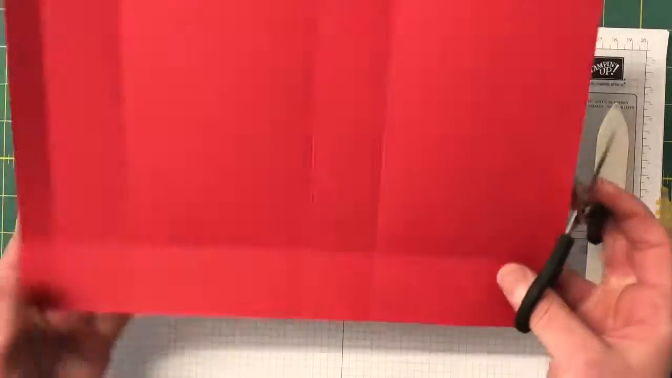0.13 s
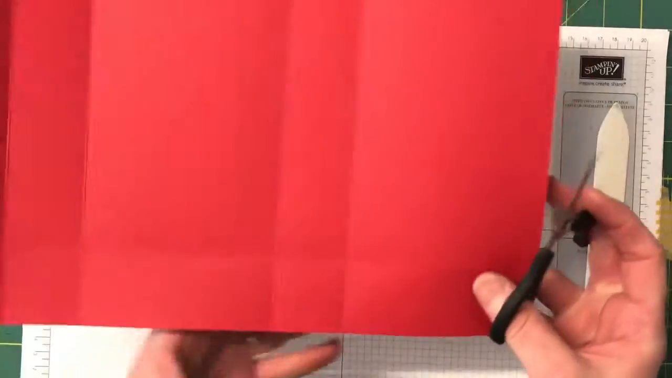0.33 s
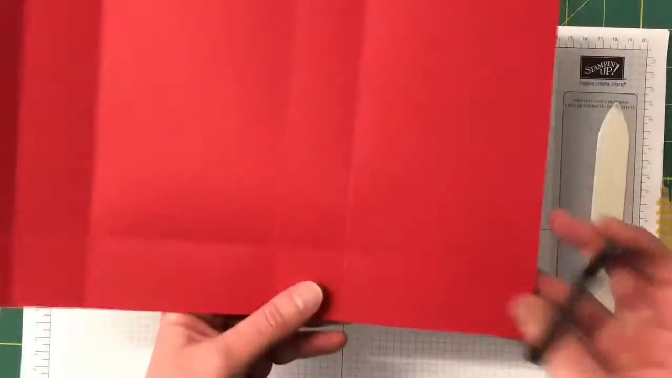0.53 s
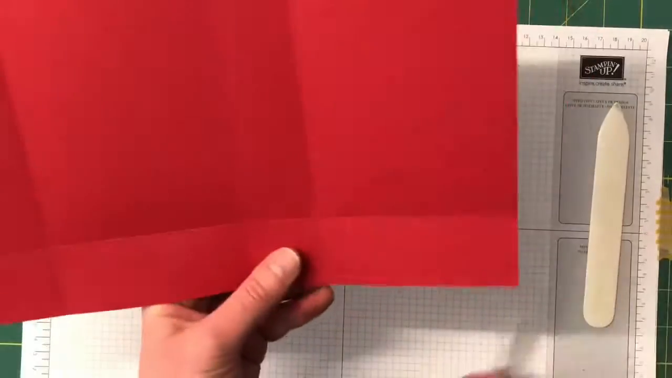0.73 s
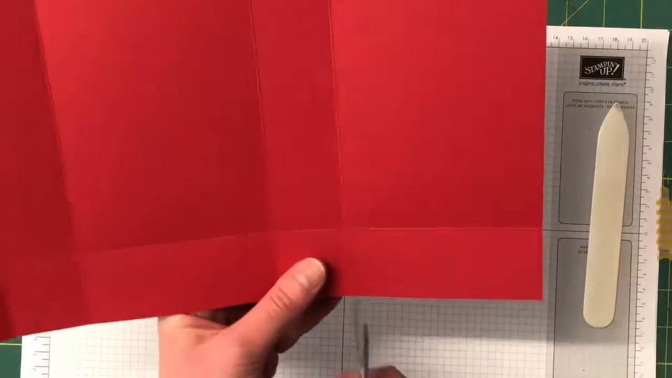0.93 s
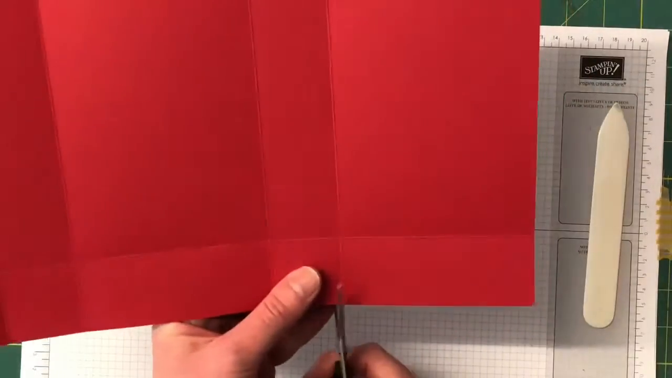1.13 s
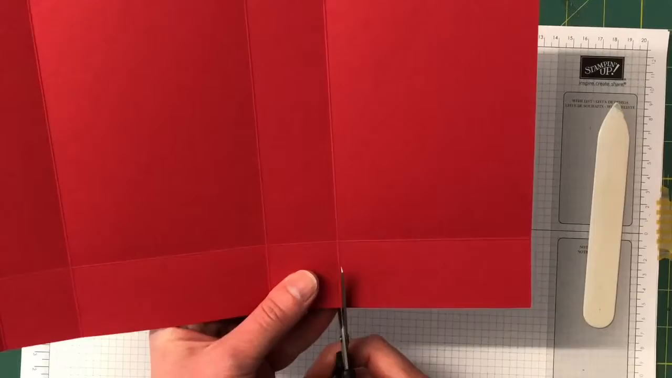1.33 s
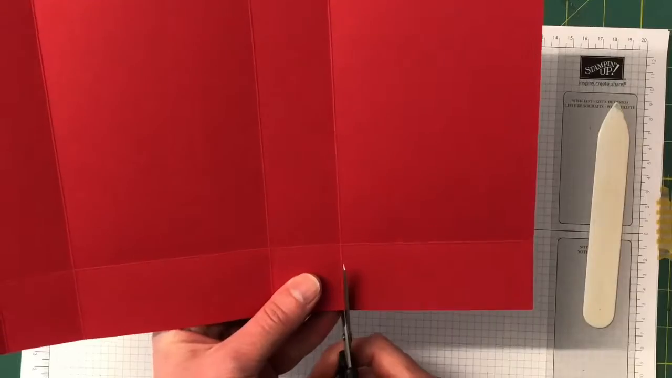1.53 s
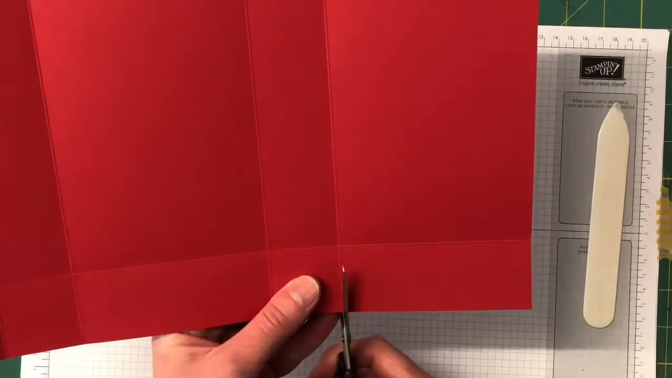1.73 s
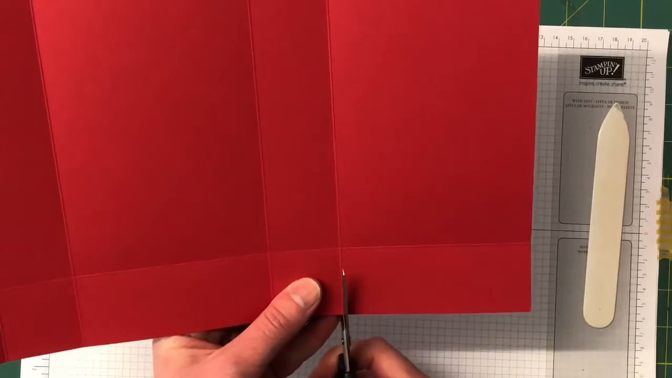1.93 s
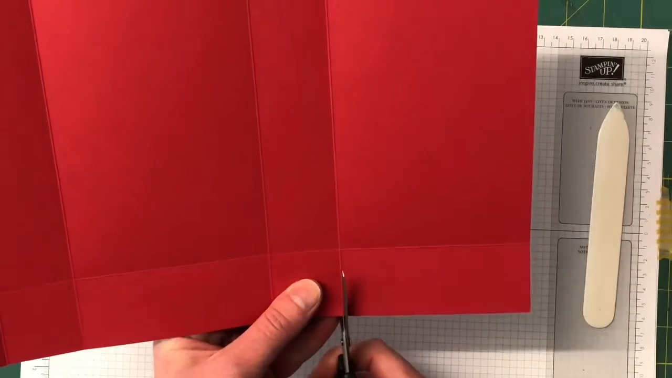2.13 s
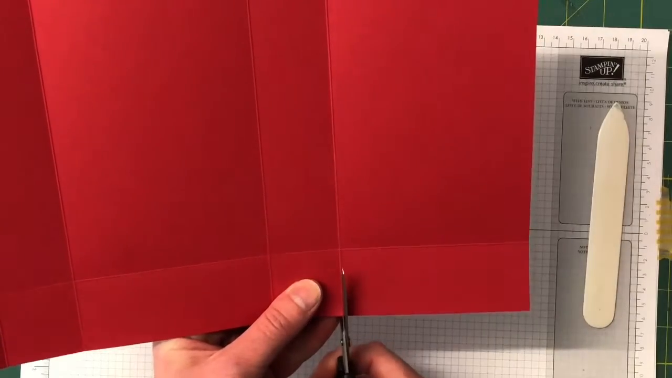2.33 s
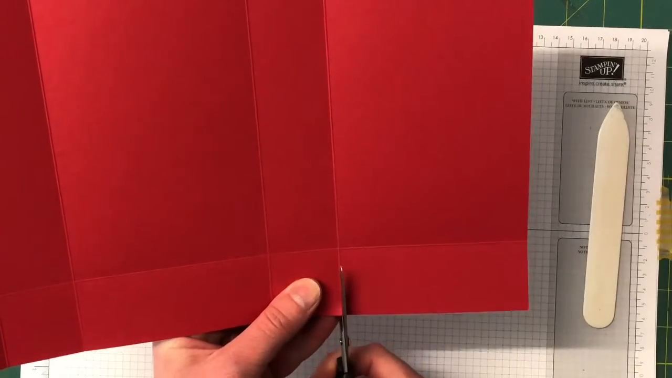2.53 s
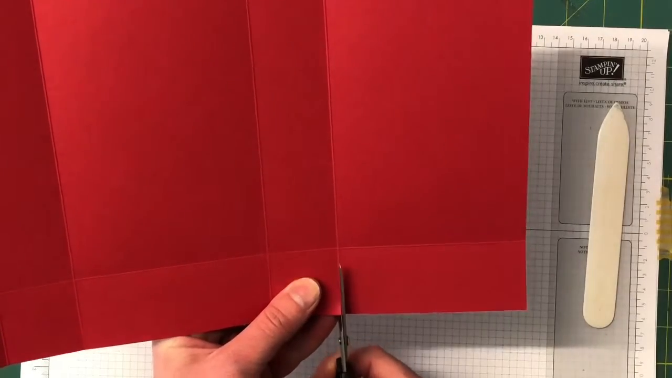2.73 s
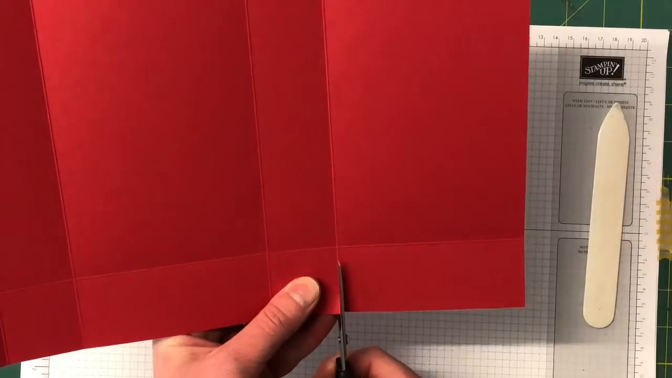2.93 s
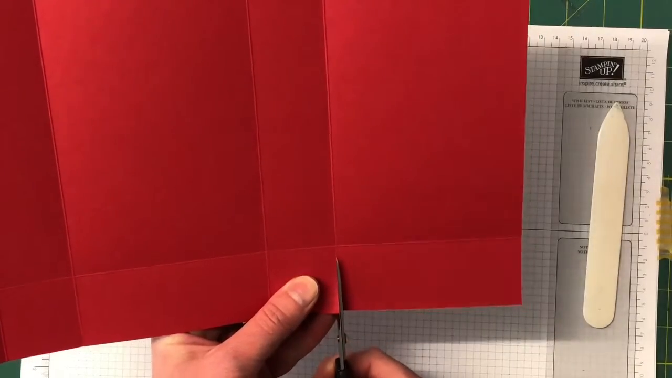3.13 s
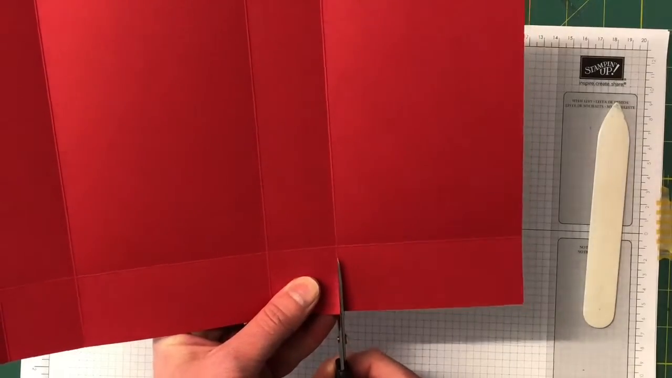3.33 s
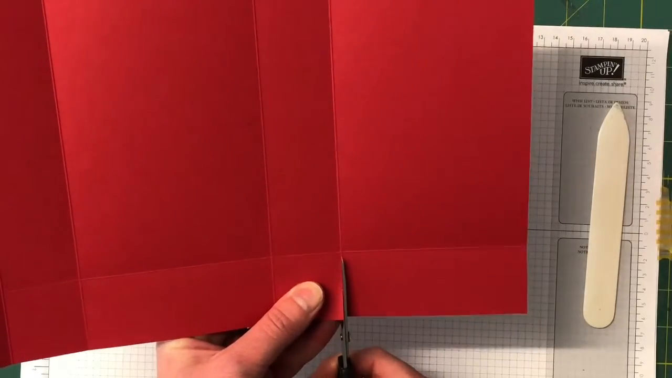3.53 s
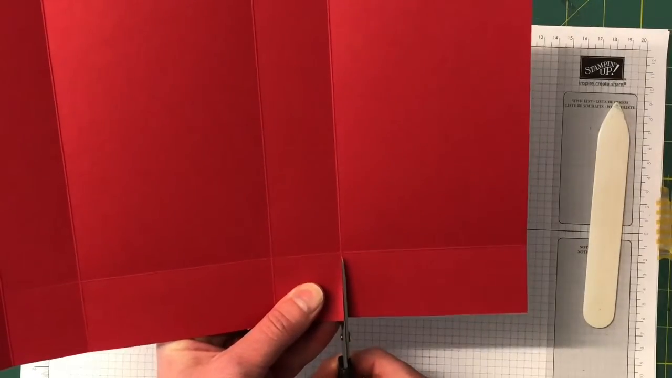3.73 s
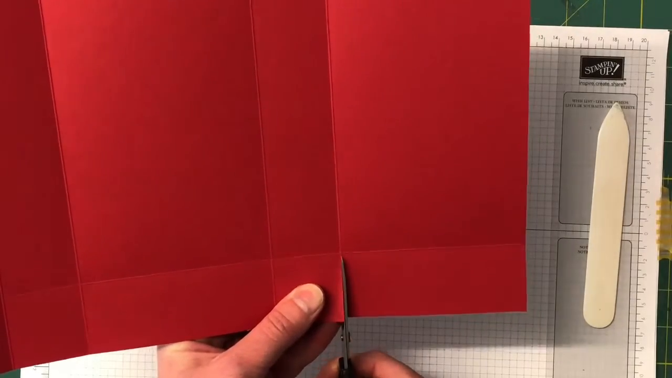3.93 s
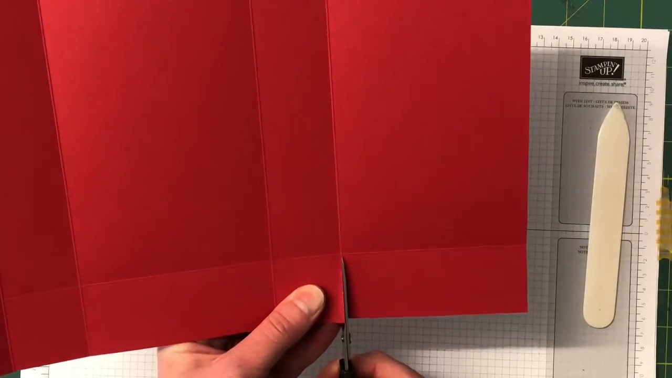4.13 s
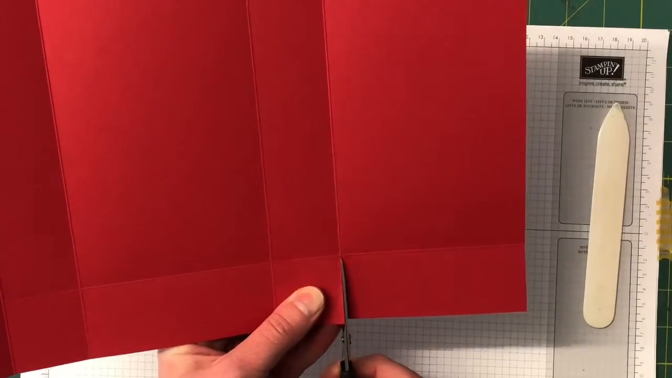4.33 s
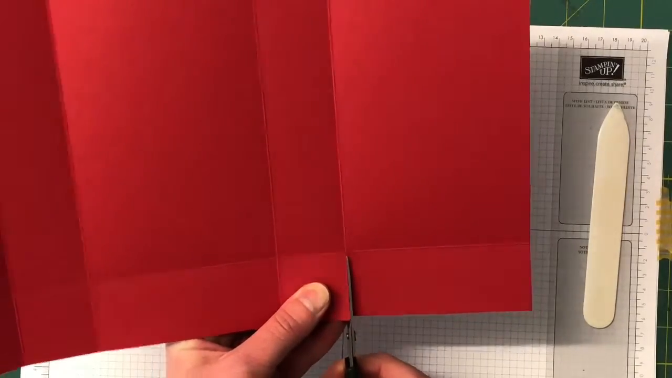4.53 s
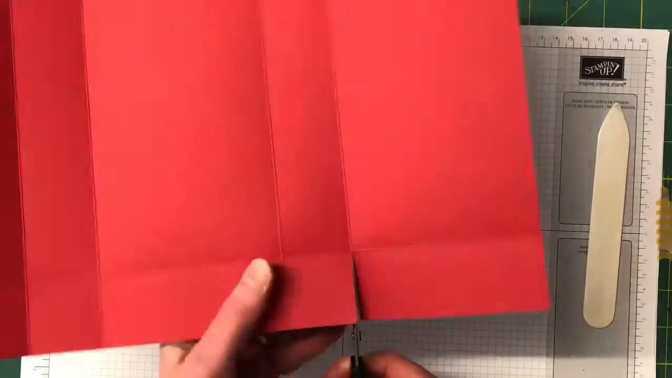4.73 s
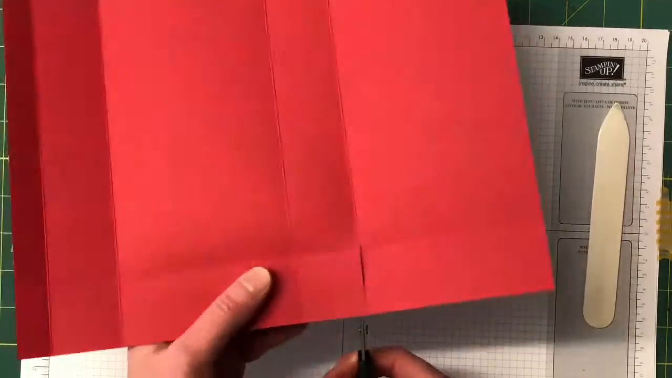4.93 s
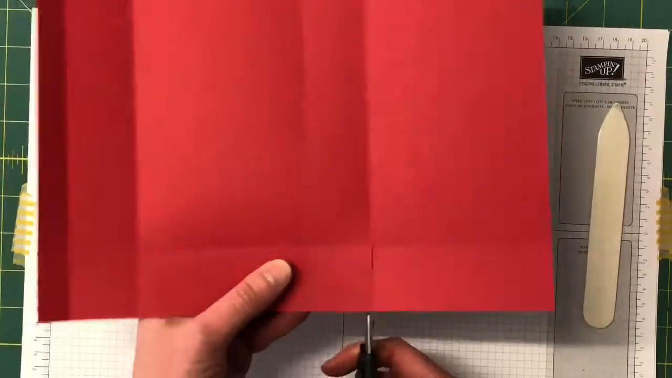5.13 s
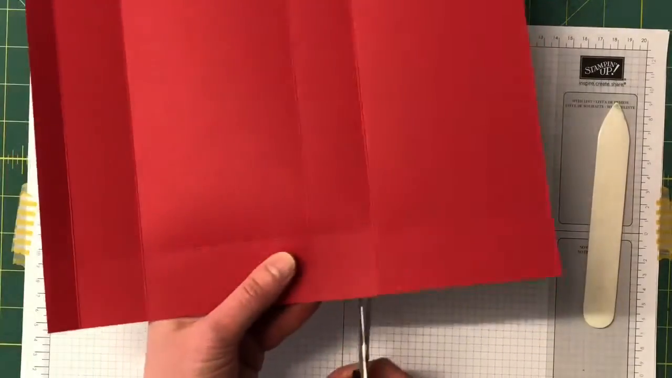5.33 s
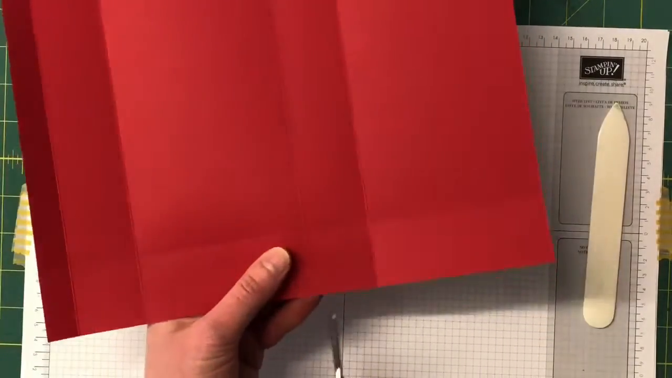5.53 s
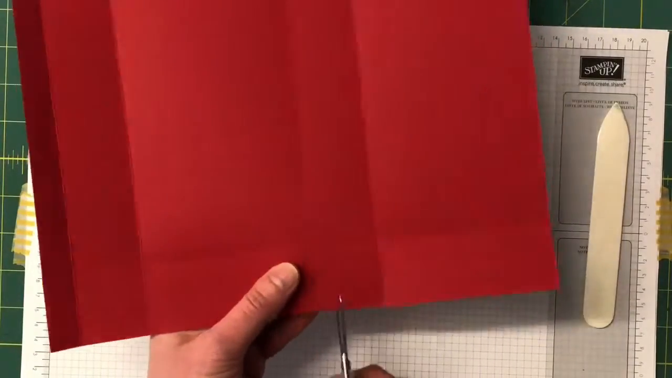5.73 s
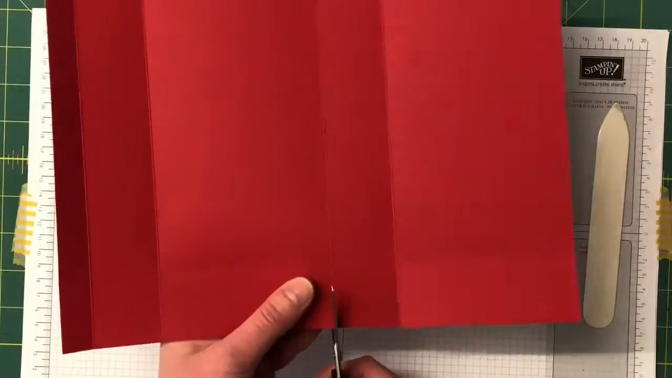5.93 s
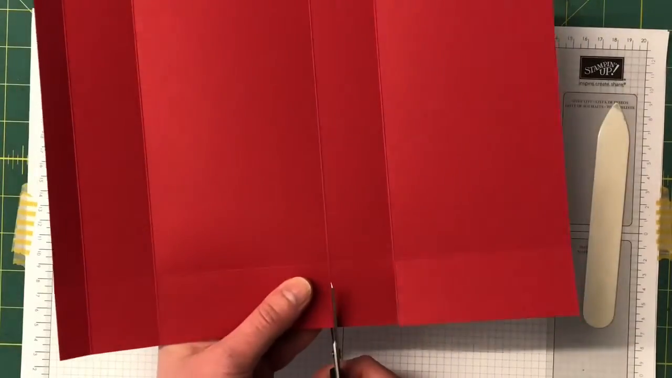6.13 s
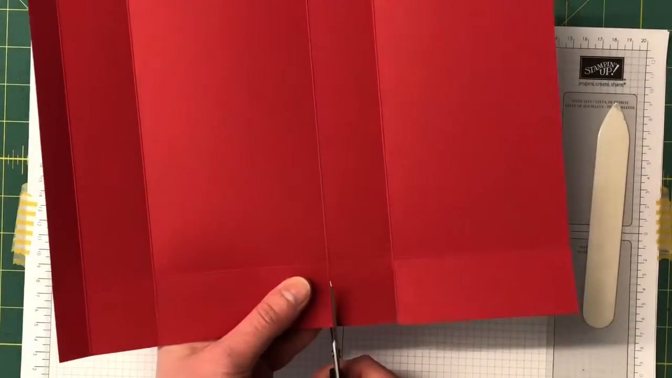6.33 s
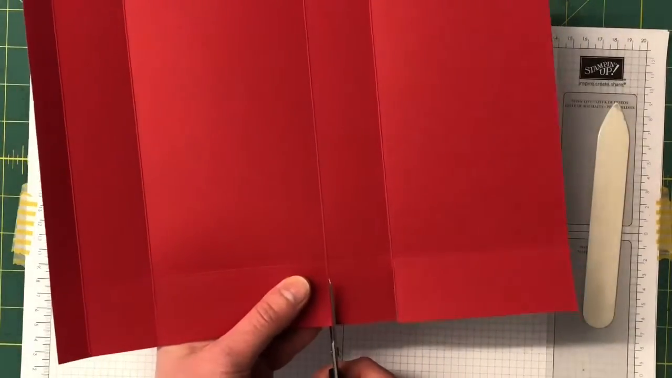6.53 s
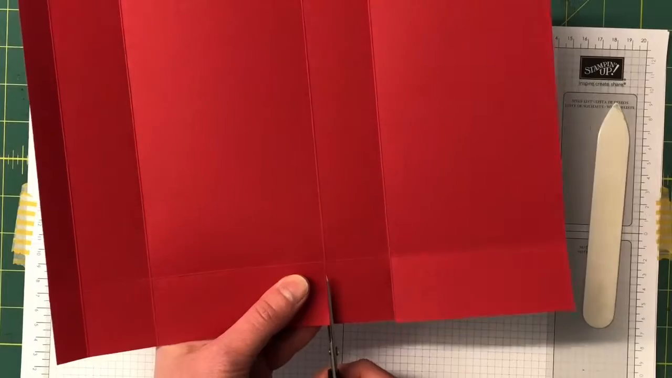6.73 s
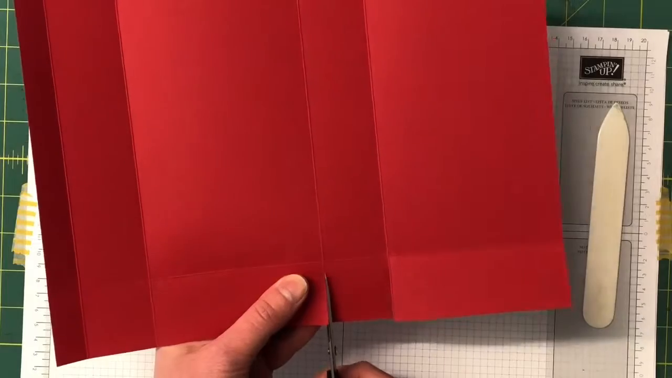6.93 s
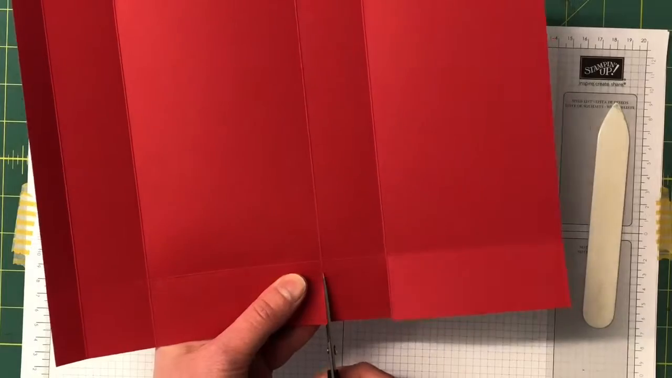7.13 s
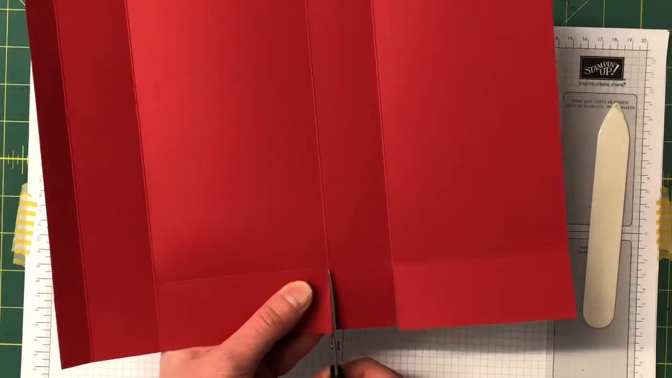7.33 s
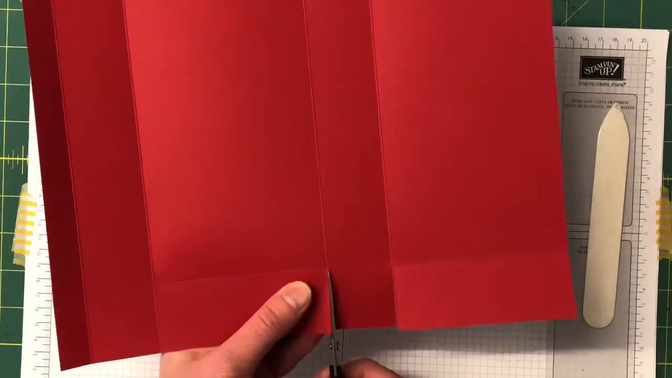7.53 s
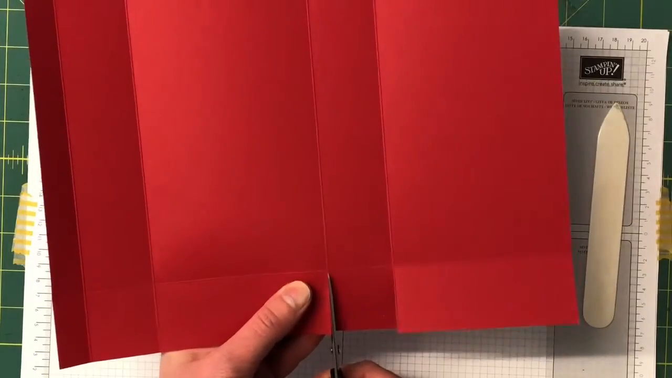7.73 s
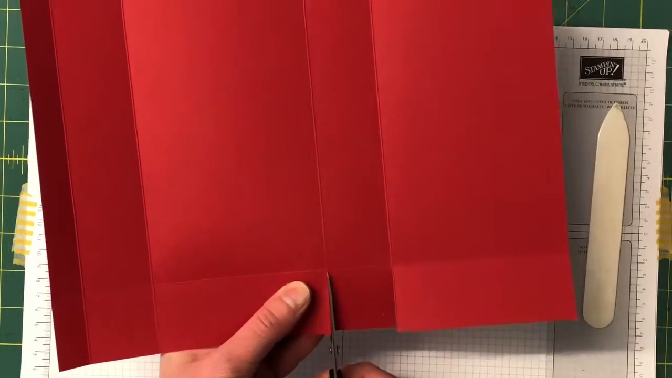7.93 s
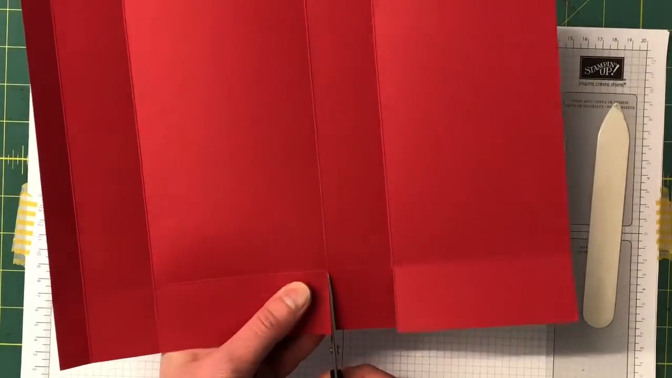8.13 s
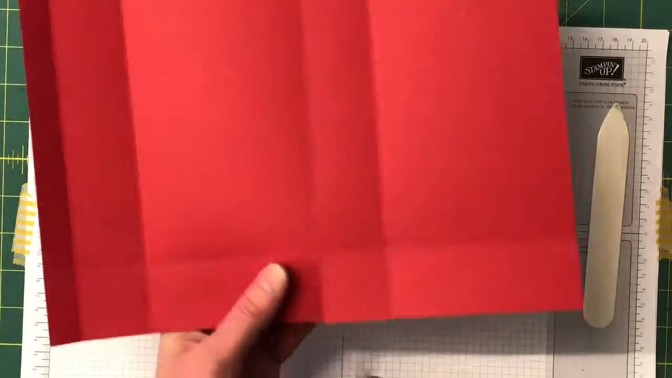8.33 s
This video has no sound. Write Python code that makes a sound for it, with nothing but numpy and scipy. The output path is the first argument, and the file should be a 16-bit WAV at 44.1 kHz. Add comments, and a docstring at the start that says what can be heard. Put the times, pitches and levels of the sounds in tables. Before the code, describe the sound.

Hands shift stiff card with sharp snaps, papery rubs and dull low thuds, then settle into quiet. Scissors bite gradually, fibres tearing in gritty bursts with a thin steely ring, and snip shut. Clicks and a brushing drag follow as the sheet is moved, before another slow crunchy cut, quick snips and one hard closing crack. Close, dry sound in a small quiet room with faint low hum.

```python
"""Scissors in stiff card

Close to the microphone, scissors cut stiff card held over a craft table in a quiet room.
The closing blades tear the fibres in short bursts: rough noise rings the blades and the cut edge.
Between the cuts blades and fingers slide along the sheet, a smoother noise coloured by the touch.
The sheet snaps (crack, falling sweep, ringing modes) and wobbles when moved (low tones in dull noise).
A faint short echo follows the near sounds, and shaped noise makes the soft room hum underneath."""
import sys
import numpy as np
from scipy import signal
from scipy.fft import rfft, irfft
from scipy.io import wavfile

SR = 44100
rng = np.random.default_rng(int(sys.argv[2]) if len(sys.argv) > 2 else 0)


def digitize_waveform(pressure):
    """Quantize a signal to 16-bit integers and store it at the path in sys.argv[1].

    Rows of a 2-D input are taken as channels; values are limited to [-1, 1].
    """
    field = np.atleast_2d(pressure).T
    bounded = np.clip(field, -1, 1)
    quanta = np.round(bounded * 32767).astype(np.int16)
    wavfile.write(sys.argv[1], SR, quanta)


def field_ratio(decibels):
    """Amplitude ratio for a level in dB (20 dB per decade); scalars and array-likes work."""
    return 10 ** (np.asarray(decibels, dtype=float) / 20)


N = 369116   # length [samples]

BOOM_HZ, TREBLE_HZ = 1400, 7000   # where boom meets middle, and middle meets treble


def cutting():
    """Shearing fibres ring the blades; the tear advances in jerks, the strongest as separate bursts."""
    # slow cuts, the blades closing bit by bit:
    # (time [s], relative level [dB], centre of the ringing [Hz], treble re shear [dB])
    slow_cuts = [
        [(2.28, -77, 3180, -4), (2.6, -73, 3300, -2), (2.85, -71.5, 3850, -7.5), (3.0, -64.5, 5400, -12),
         (3.12, -56, 5400, -13.5), (3.2, -58, 4730, -8), (3.3, -55, 4700, -7.5)],
        [(6.515, -63.5, 3750, -11), (6.65, -64.5, 3660, -8), (6.8, -59.5, 3770, -8.5),
         (6.95, -57.5, 3700, -11.5), (7.08, -55, 3900, -8.5), (7.175, -55.5, 4160, -3)],
    ]
    # quick snips: (start [s], length [s], relative level [dB], fade over the snip [dB],
    # centre of the ringing [Hz])
    snips = [(3.895, 0.12, -47, 7, 4280), (7.555, 0.051, -57.5, 4, 4200), (7.995, 0.074, -52, -3, 4070),
             (8.09, 0.022, -58, 3, 3200)]
    # fibres giving way in a burst: (time [s], relative level [dB])
    tears = [(0.069, -37), (0.4564, -53), (0.5245, -49), (2.4533, -63), (2.847, -63.5), (2.9402, -59),
             (3.148, -57), (3.2394, -58), (4.539, -65), (6.983, -63), (7.058, -56), (2.969, -55.5),
             (3.0659, -60), (3.167, -55), (3.2231, -46.5), (3.276, -63), (3.2945, -51.5), (3.8872, -54),
             (3.9055, -68), (3.932, -51), (3.956, -47), (3.98, -43), (3.999, -44), (4.3824, -42),
             (4.3877, -35), (4.631, -58.5), (4.773, -42.5), (5.3137, -48), (5.7505, -60.5), (6.528, -61),
             (6.6947, -61), (6.77, -57), (7.007, -51), (7.036, -50), (7.0998, -60), (7.125, -39),
             (7.3003, -51), (7.5792, -49), (7.593, -56), (7.9969, -44.5), (8.015, -45), (8.0331, -41.5),
             (8.0958, -43), (8.105, -45), (8.3598, -38)]
    # colour of the shearing noise: (frequency [Hz], relative level per Hz [dB])
    shear = [(150, -48), (250, -14.5), (831, -8.5), (1140, -14.5), (1820, -7), (2130, -7.5), (4260, -10),
             (5160, -14), (11300, -19.5), (14900, -13), (16000, -38)]
    boom_db, snip_treble_db = -2, -6.5   # re shear
    tear_rise_ms, jerks_per_s = 4.2, 80

    cuts = slow_cuts + even(snips, snip_treble_db)
    gain, centre_hz, treble_db = strokes(cuts, attack_s=0.018, release_s=0.025)
    boom, middle, treble = friction(shear, centre_hz, spread_db=2.9, ring_db=12,
                                    flicker_db=4.5, lean_db=46.0)

    # small tears come at random
    jerks = (rng.random(N) < jerks_per_s / SR) * field_ratio(3.8 * rng.standard_normal(N))
    jerky = signal.fftconvolve(jerks, burst(tear_rise_ms))[:N]
    gain = gain * (field_ratio(-3.5) + field_ratio(-5.5) * jerky)
    for s, db in tears:
        add(gain, s - .0012, field_ratio(db) * burst(tear_rise_ms))
    return gain * (field_ratio(boom_db) * boom + middle + field_ratio(treble_db) * treble)


def sliding():
    """Smooth friction on the coated surface, slightly uneven; a light touch is thin and bright."""
    # blades and fingers sliding on the card: (start [s], length [s], relative level [dB],
    # fade over the slide [dB], lightness of touch [0-1])
    slides = [(-.02, 0.043, -55.5, 12, 0.28), (0.09, 0.077, -45.5, 8.5, 0.1), (0.17, 0.052, -54.5, 2, 0.67),
              (0.25, 0.066, -70, 3, 0.32), (0.455, .1, -63.5, -8.5, 0.23), (0.56, 0.122, -59.5, -4.5, 0.83),
              (0.72, 0.23, -60.5, 9.5, 0.29), (1.41, 0.084, -67, 1, 0.09), (3.42, 0.13, -50.5, 9.5, 0.48),
              (3.61, 0.019, -66, 5, .35), (3.665, 0.019, -59.5, 2.5, 0.22), (4.41, 0.096, -53.5, 20, 0.18),
              (4.52, 0.19, -65.5, 2.5, 0.22), (4.7, 0.068, -52.5, 1, 0.7), (4.765, 0.22, -51, 8.5, .65),
              (5.085, 0.13, -56, 7.5, 0.34), (5.5, 0.09, -63, 15, .1), (7.295, 0.098, -49, 0.5, 0.6),
              (7.76, 0.073, -52, 8, 0.34), (8.13, 0.17, -59, 16.5, 0.14), (8.27, 0.1, -51, -6, 0.66)]
    # the sheet is dragged off the blades: (time [s], relative level [dB], lightness of touch [0-1])
    drag = [(5.2, -56, 0.42), (5.27, -48, 0.28), (5.34, -57.5, 0.48), (5.39, -45, 0.72), (5.45, -53.5, 0.3),
            (5.495, -48, 0.36)]
    # colour of the rubbing noise: (frequency [Hz], relative level per Hz [dB])
    rub = [(150, -53), (250, -1.5), (319, -5), (607, -7), (1380, -5.5), (3280, -4.5), (4260, -6),
           (4900, -8.5), (6940, -5), (14700, -7.5), (16000, -22)]

    gain, lightness = strokes(even(slides) + [drag], attack_s=0.019, release_s=0.027)
    # from a heavy to a light touch; boom and treble re the middle
    boom_db = np.interp(lightness, [0, 1], [4.6, -18])
    treble_db = np.interp(lightness, [0, 1], [-15.5, -0.56])
    centre_hz = np.interp(lightness, [0, 1], [2620, 5150])

    boom, middle, treble = friction(rub, centre_hz, spread_db=0.85, ring_db=7,
                                    flicker_db=6.0, lean_db=21.5)
    boom = boom * field_ratio(1.7 * drift(40.0))
    unevenness = field_ratio(1.2 * drift(24))
    return gain * unevenness * (field_ratio(boom_db) * boom + middle + field_ratio(treble_db) * treble)


def friction(spectrum, centre_hz, spread_db, ring_db, flicker_db, lean_db):
    """Grit rings resonances that come and go, leaning to a centre; boom, middle, treble at rms 1."""
    # ringing of blades and cut edge: (frequency [Hz], width [Hz], relative level [dB])
    blades = [(593, 147, -2.5), (795, 47, -7), (958, 110, -7.5), (1223, 510, -13.5), (2170, 45, -0.5),
              (2746, 660, 1.5), (3470, 330, -3), (4004, 49, -2.5), (4660, 210, -0.5), (5070, 310, 4),
              (5690, 79, -0.5), (6470, 170, -4), (7046, 86, -6), (8200, 430, -23), (12870, 370, -30)]

    broad = rms_one(colour(grit(spread_db), spectrum))
    rings, power = 0, 0
    for hz, width_hz, level_db in blades:
        r = np.exp(-np.pi * width_hz / SR)
        poles = [1, -2 * r * np.cos(2 * np.pi * hz / SR), r * r]
        line = signal.lfilter([(1 - r * r) / 2, 0, (r * r - 1) / 2], poles, broad)
        # a high centre favours the high modes of the middle register
        lean = np.log2(hz / 3800) * np.log2(centre_hz / 3900) * (BOOM_HZ < hz < TREBLE_HZ)
        weight = field_ratio(flicker_db * drift(7.4) + lean_db * lean)
        rings = rings + field_ratio(level_db) * weight * line
        power = power + weight ** 2
    rings = rings / np.sqrt(power / len(blades))
    return [rms_one(part) for part in registers(broad + field_ratio(ring_db) * rings)]


def snaps():
    """A crack, a falling sweep (high bending waves outrun low ones), a table echo, the card modes."""
    # the sheet snaps or the blade tips close: (time [s], relative level [dB],
    # sheet boom re middle [dB], treble re middle [dB], ring length factor)
    blows = [(0.0556, -17.5, -6, -5.5, 0.96), (0.098, -19.5, -2, -5, 0.91), (0.5057, -45, 13, -16, 0.54),
             (0.5427, -34, -19, -11, 0.74), (0.6865, -30, -5.5, -3, 0.4), (2.0512, -52, 3, -4.5, 1),
             (4.3976, -19, -0.5, -2.5, 0.62), (4.696, -28, 6.5, -6.5, 0.51), (5.5011, -26, -3, -15, 0.68),
             (8.1186, -10, -3, -17, 1)]
    # modes of the card: (frequency [Hz], relative level [dB], relative decay time)
    card = [(584, -5, 0.036), (876, 8, 0.048), (2640, -15, 0.068), (2970, -4, 0.05), (3500, -1.5, 0.15),
            (3960, -12, 0.058), (4100, -22, 0.0767), (5600, -10, 0.04), (6400, -26.5, 0.15),
            (8290, -30, 0.054)]

    out, length = np.zeros(N), 6000
    t = np.arange(length) / SR
    sweep_hz = 600 + 5200 / (1 + t / 0.00122) ** 2.413
    sweep = np.sin(2 * np.pi * np.cumsum(sweep_hz) / SR) * np.exp(-t / 0.0019)
    thin = signal.butter(3, 480, "high", fs=SR, output="sos")
    dip = signal.iirnotch(1550, 2.8, fs=SR)          # the sheet radiates poorly between boom and click
    dull = signal.butter(1, 8000, fs=SR)             # thick card cracks without much sizzle

    for s, db, boom_db, treble_db, factor in blows:
        crack_fade = np.exp(-t / 0.0031) + field_ratio(-30) * np.exp(-t / (0.025 * factor))
        crack = rng.standard_normal(length) * crack_fade
        modes = np.zeros(length)
        for hz, level_db, decay in card:
            chance_db = rng.normal(0, 1.0)           # each blow strikes the modes a little differently
            modes += field_ratio(level_db + chance_db - 31) * ring(length, hz, 0.49 * decay * factor)
        blow = signal.sosfilt(thin, field_ratio(-2.0) * sweep + crack + modes)
        blow = signal.lfilter(*dip, blow)
        blow = signal.lfilter(*dull, blow)
        add(blow, .008, field_ratio(-16.0) * blow.copy())    # echo off the table
        boom, middle, treble = registers(blow, treble_hz=4700)
        add(out, s, field_ratio(db) * (field_ratio(boom_db) * boom + middle + field_ratio(treble_db) * treble))
    return out


def wobbles():
    """A soft push rings a low bending mode; its many neighbours blur into a dull, broken thud."""
    # the whole sheet flexes: (time [s], relative level [dB], pitch [Hz])
    flexes = [(0.058, -32.5, 332), (0.074, -30, 497), (0.105, -32.5, 598), (0.292, -38, 273),
              (0.527, -38, 487), (0.544, -34.5, 375), (0.637, -43, 369), (0.693, -37, 397),
              (0.715, -44, 340), (0.739, -46, 370), (0.757, -36, 250), (0.858, -37.5, 229),
              (4.408, -34, 484), (4.761, -37.5, 484), (5.503, -38.5, 457)]
    cycles = 42.0   # until the tone has died by 60 dB

    out, length = np.zeros(N), 9000
    t = np.arange(length) / SR
    push = 1 - np.exp(-t / 0.0021)
    for s, db, hz in flexes:
        t60 = cycles / hz
        around = signal.butter(4, [0.23 * hz, 2.09 * hz], "band", fs=SR, output="sos")
        thud = rms_one(signal.sosfilt(around, rng.standard_normal(length)))
        thud = thud * field_ratio(-60 * t / (1.03 * t60))
        add(out, s, field_ratio(db) * push * (field_ratio(-4.5) * ring(length, hz, t60) + field_ratio(-4) * thud))
    return out


def room(x):
    """The room's echo: eight feedback delays, duller on every round."""
    t60_s, wall_cut_hz = 0.27, 8900   # decay of the lows; treble lost on every round
    out, dull = np.zeros(N), np.exp(-2 * np.pi * wall_cut_hz / SR)
    lags = (np.geomspace(.009, .031, num=8) * SR).astype(int)
    for k, lag in enumerate(lags):
        loop, gain, state = x.copy(), field_ratio(-60 * lag / SR / t60_s), [0.]
        for i in range(lag, N, lag):
            back, state = signal.lfilter([gain * (1 - dull)], [1, -dull], loop[i - lag:i], zi=state)
            loop[i:i + lag] += back[:N - i]
        out += (loop - x) * (-1) ** k   # echoes alone, alternating in sign
    return out


def hum():
    """Steady room air: shaped noise with a few resonances, most of them low."""
    # colour of the air: (frequency [Hz], relative level per Hz [dB])
    air = [(15, -39.5), (25, -19), (43, -13.5), (213, -6.5), (312, -12.5), (347, -12.5), (582, -19.5),
           (898, -19.5), (1680, -26), (6330, -34), (6870, -35.5), (15100, -40.5), (16400, -36)]
    # resonances standing out of it: (frequency [Hz], width [Hz], height [dB])
    air_peaks = [(49.7, 16, 11), (110.7, 15.8, 10), (140, 23, 2.5), (186.6, 9.4, 2), (216.7, 5.9, 6),
                 (15200, 250, 9)]
    return field_ratio(-63) * rms_one(colour(rng.standard_normal(N), air, air_peaks))


def rms_one(x):
    """Scaled to rms 1."""
    return x / np.sqrt(np.mean(x ** 2) + 1e-20)


def colour(x, spectrum, peaks=()):
    """Noise shaped by a spectrum, with resonances standing out of it."""
    hz = np.maximum(np.arange(N // 2 + 1) * SR / N, 1)
    points = np.array(spectrum)
    db = np.interp(np.log(hz), np.log(points[:, 0]), points[:, 1])
    for peak_hz, width_hz, peak_db in peaks:
        db = db + peak_db / (1 + (2 * (hz - peak_hz) / width_hz) ** 2)
    return irfft(rfft(x) * field_ratio(db), N)


def registers(x, treble_hz=TREBLE_HZ):
    """Boom, middle and treble of a sound."""
    def cut(hz, kind):
        return signal.sosfilt(signal.butter(3, hz, kind, fs=SR, output="sos"), x)
    return cut(BOOM_HZ, "low"), cut([BOOM_HZ, treble_hz], "band"), cut(treble_hz, "high")


def drift(rate_hz):
    """Slow random wander of rms 1: noise through a two-pole low-pass, its first second left out."""
    r = np.exp(-2 * np.pi * rate_hz / SR)
    return rms_one(signal.lfilter([1], [1, -2 * r, r * r], rng.standard_normal(N + SR))[SR:])


def grit(spread_db):
    """Dense fibre clicks of uneven size."""
    return rng.standard_normal(N) * field_ratio(spread_db * np.minimum(rng.exponential(1, N), 5))


def even(rows, *shared):
    """Strokes that fade evenly from start to end."""
    return [[(s, db, value, *shared), (s + length, db - fade_db, value, *shared)]
            for s, length, db, fade_db, value in rows]


def strokes(curves, attack_s, release_s):
    """Gain of strokes that swell in and die out, and their controls; the louder rules where two meet."""
    gain, controls, t = np.full(N, 1e-12), 0, np.arange(N) / SR
    for rows in curves:
        s, db, *values = np.transpose(rows)
        swell = np.clip((t - s[0]) / attack_s, 0, 1)
        fade = np.exp(-3 * np.clip(t - s[-1], 0, 1) / release_s)
        one = swell * fade * field_ratio(np.interp(t, s, db)) + 1e-9
        gain = gain + one
        controls = controls + one * np.array([np.interp(t, s, v) for v in values])
    return gain, *(controls / gain)


def ring(length, hz, t60):
    """A decaying sine that starts at height 1."""
    t = np.arange(length) / SR
    return np.sin(2 * np.pi * hz * t) * field_ratio(-60 * t / t60)


def burst(rise_ms):
    """An envelope that swells to 1, then dies away."""
    u = np.arange(2000) * 1000 / SR / max(rise_ms, .5)
    return (u * np.exp(1 - u)) ** 3


def add(out, s, sound):
    """Mix a short sound in at a time."""
    i = round(s * SR)
    out[..., i:i + sound.shape[-1]] += sound[..., :out.shape[-1] - i]


def scene():
    """Hands and card close by, their echo, the room air."""
    near = cutting() + sliding() + snaps() + wobbles()
    echo = field_ratio(-24) * room(near)
    return (near + echo + hum())[None]


def top_cut(x):
    """Nothing passes above the cut-off."""
    return signal.sosfilt(signal.butter(12, 16520, fs=SR, output="sos"), x)


def record(dry):
    """The microphone drops the lowest bass and the top."""
    no_rumble = signal.sosfilt(signal.butter(4, 40, "high", fs=SR, output="sos"), dry)
    mix = signal.sosfilt(signal.cheby2(8, 50, 17100, fs=SR, output="sos"), no_rumble)
    return top_cut(mix)


dry = scene()
out = record(dry)
digitize_waveform(out)
```